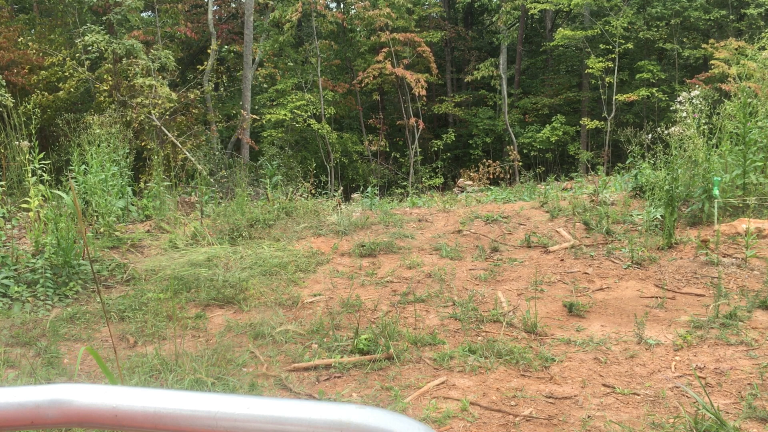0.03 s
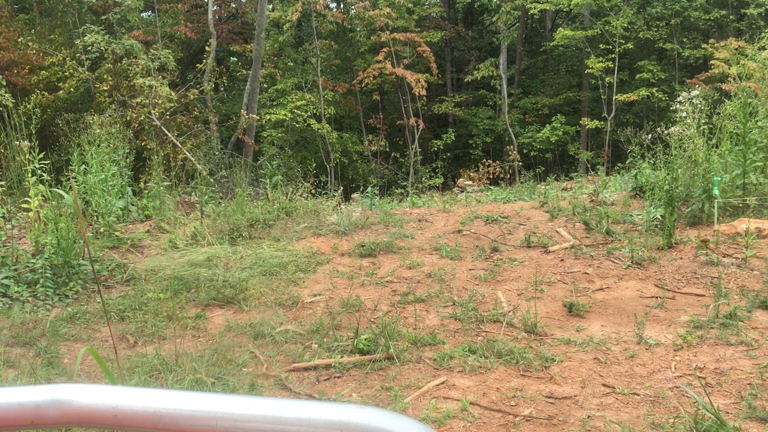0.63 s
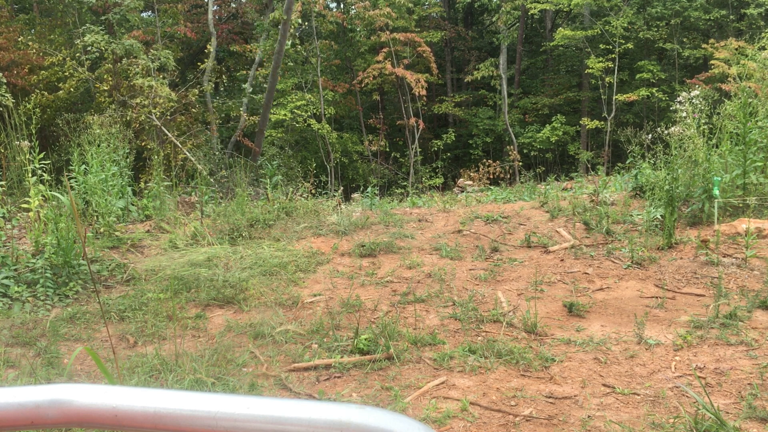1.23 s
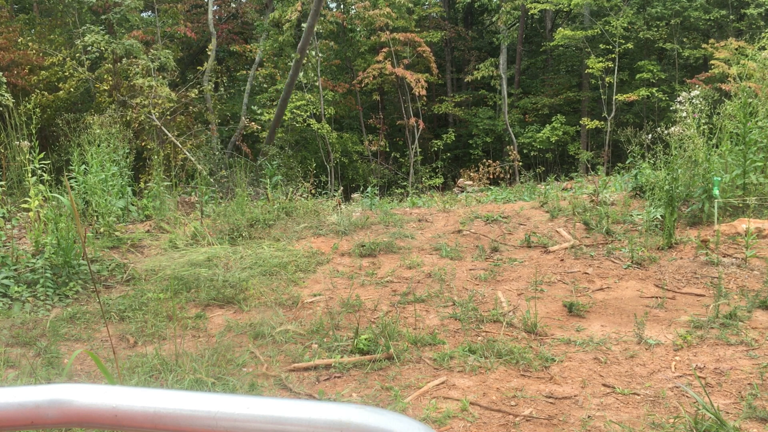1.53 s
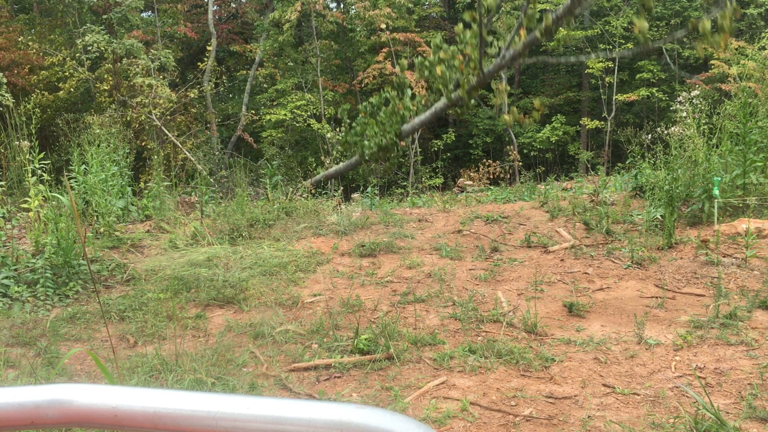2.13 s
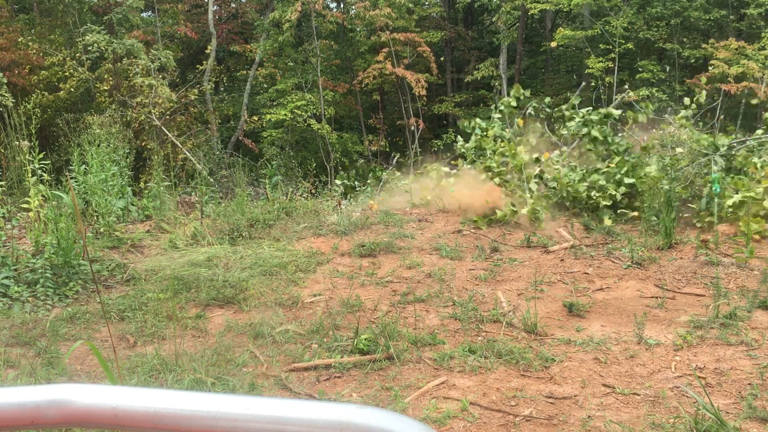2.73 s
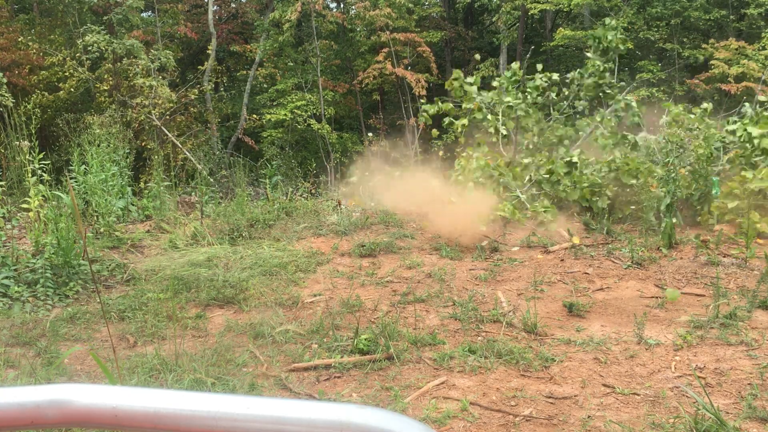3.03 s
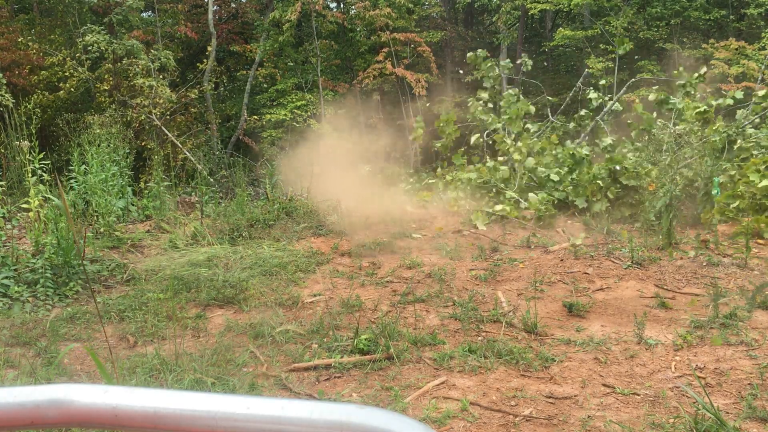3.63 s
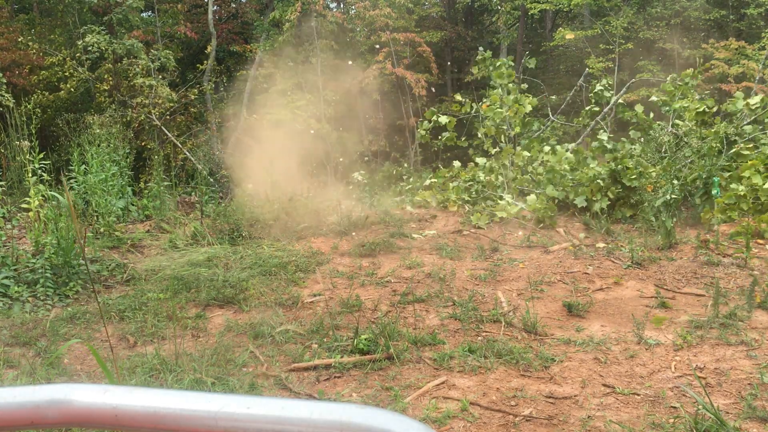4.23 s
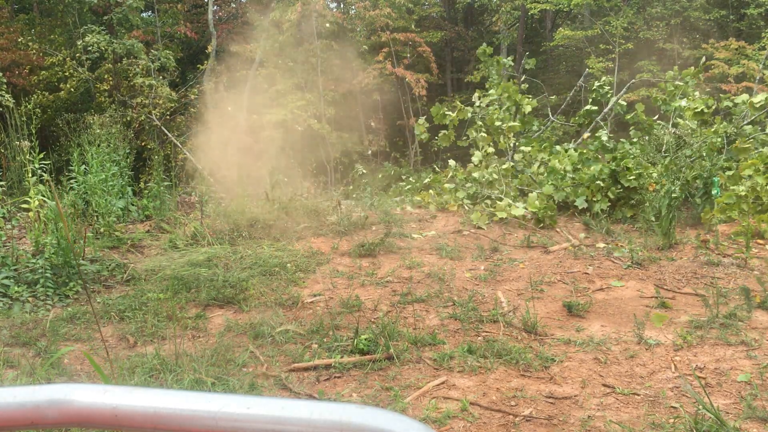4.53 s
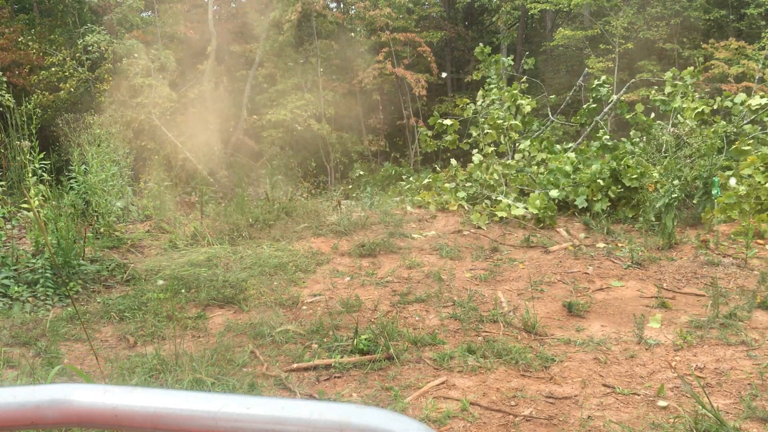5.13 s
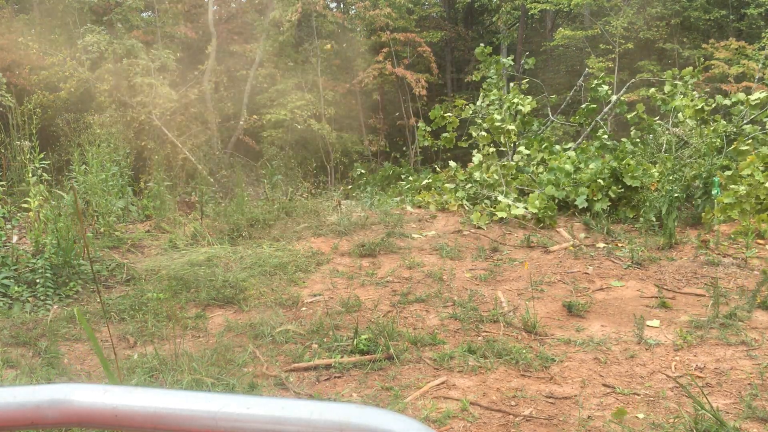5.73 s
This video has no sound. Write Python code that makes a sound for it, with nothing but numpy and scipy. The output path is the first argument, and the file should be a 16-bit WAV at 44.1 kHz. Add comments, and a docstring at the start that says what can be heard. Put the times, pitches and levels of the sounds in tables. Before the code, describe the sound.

Outdoors at a forest edge, a faint low machine drone and soft hiss lie under a growing rush of leaves. A falling tree knocks against its neighbours, then crashes onto dry earth with loud cracking limbs, a burst of foliage and a deep thud. The trunk bounces once, the leaves rustle away and a few twigs click as they drop.

```python
"""At the edge of a forest clearing, a tall leafy tree is felled. Its crown rushes through the air
ever faster and brushes its neighbours. Limbs snap, the trunk thuds onto dry earth and bounces once,
and the leaves shiver to rest. Twigs keep dropping over a low machine drone, faint high ticks and the
steady hiss of the forest. Leaves are noise plus many tiny clicks, breaking wood is short bursts of
noise, and the trunk is a few slow cycles of a low tone over a rumble."""
import sys
import numpy as np
from scipy import signal
from scipy.fft import rfft, irfft
from scipy.io import wavfile
from scipy.ndimage import uniform_filter1d

SR = 44100
rng = np.random.default_rng(int(sys.argv[2]) if len(sys.argv) > 2 else 0)


def to_wav(sig):
    """Store sig (one row per channel, or 1-D mono) as 16-bit WAV at the path in sys.argv[1].

    Samples outside -1..1 are clipped; the rate is SR.
    """
    pcm = np.clip(np.atleast_2d(sig), -1, 1) * 32767
    pcm = np.round(pcm).astype(np.int16)
    wavfile.write(sys.argv[1], SR, pcm.T)  # frames by channels


N = 263718
T = np.arange(N) / SR
FREQS = np.maximum(np.arange(N // 2 + 1) * SR / N, 1)

# The tone colour of each noise. Each row: frequency in Hz, relative level in dB.
FOREST_SPECTRUM = [(30, -3), (150, 11), (350, 4), (800, 1.5), (1600, -7), (3200, -4), (4500, -10.5),
                   (5600, -9.5), (7200, -16.5), (10500, -25), (13000, -16.5), (15500, -24.5)]
DRONE_SPECTRUM = [(22, -22), (37, -6.5), (55, 0), (80, -3.5), (100, -7.5), (130, -20), (220, -24),
                  (500, -40.5), (1500, -81.5)]
FLUTTER_SPECTRUM = [(200, -9), (700, -10), (1600, -0.5), (3000, 2), (4200, -4.5), (6000, -11.5),
                    (8000, -18), (10500, -24.5), (13000, -30), (15500, -46.5)]
SLAP_SPECTRUM = [(400, -13), (900, -3), (2000, 3), (3300, 5), (4500, -3.5), (6200, -8.5), (8000, -20.5),
                 (11000, -19), (12500, -31), (15500, -42.5)]
TEAR_SPECTRUM = [(2000, -18), (4500, -3), (6300, 4), (8500, -10), (11000, -7.5), (13000, -16.5),
                 (15500, -26)]
BOUGH_SPECTRUM = [(60, -32), (130, -4.5), (200, -1.5), (300, 0.5), (550, -7), (1000, -8.5), (1800, -29),
                  (4000, -54)]
GROUND_SPECTRUM = [(24, -35), (40, -8.5), (55, 3.5), (85, 1.5), (130, -14), (250, -32.5), (600, -50)]
# The machine's steady tones. Each row: pitch in Hz, level in dB.
HUM_TONES = [(479, -81.5), (630, -86.5), (868, -96), (1513, -84.5), (2250, -82), (3138, -84.5), (3752, -81)]
# Spells of faint whining. Each row: start in seconds, length in seconds, level in dB.
WHINE_SPELLS = [(3.583, 0.34, -76), (4.63, 0.32, -73), (5.53, 0.56, -80)]
# The machine's airy whirr. Each row: centre in Hz, width in Hz, level at idle in dB.
WHIRR_BANDS = [(1460, 130, -74), (2397, 130, -73.5)]
# Ticks outside the steady beat. Each row: start in seconds, level in dB.
OFFBEAT_TICKS = [(0.3433, -61), (.5601, -67), (4.2218, -63), (4.561, -64), (5.7862, -63)]
# Twigs snapping and dropping. Each row: start in seconds, level in dB, centre in Hz,
# width in octaves, decay in seconds.
TWIG_SNAPS = [(2.3394, -15.5, 3440, 0.25, 0.0018), (2.903, -39, 3200, 0.34, .003),
              (3.225, -34.5, 1670, .22, 0.0016), (3.972, -58, 3800, 0.73, .007),
              (4.068, -57, 3080, .7, .01), (4.462, -60.5, 4000, 0.53, .015), (4.579, -55, 3450, 0.62, .006),
              (4.586, -61, 4000, 0.68, .008), (4.618, -58, 3300, .7, 0.0025),
              (4.806, -59, 4000, 0.67, 0.0034), (4.952, -61, 3070, 0.77, 0.0043),
              (5.675, -50, 2900, .75, 0.0017)]
# Limbs knocking and breaking. Each row: start in seconds, level in dB, centre in Hz, rise in seconds.
LIMB_SNAPS = [(1.669, -43.5, 500, 0.00087), (1.761, -32, 440, 0.0028), (1.779, -32, 424, 0.0019),
              (1.851, -39, 420, .001), (1.988, -36.5, 350, 0.0017), (2.347, -18.5, 330, 0.00089),
              (2.367, -21.5, 900, 0.00243), (2.374, -10.5, 1150, .0046), (2.388, -19, 380, 0.0024),
              (2.3982, -7.5, 1800, 0.0021), (2.403, -18.5, 3300, .001), (2.442, -16, 1000, 0.0011),
              (2.449, -22.5, 605, 0.0029), (2.457, -25.5, 380, .003), (2.527, -20, 1700, .0013)]
# The trunk landing and bouncing. Each row: start in seconds, level in dB, pitch in Hz, rise in seconds.
TRUNK_THUDS = [(2.370, -13, 79.7, .021), (2.435, -23.5, 92.2, 0.02), (2.746, -24.5, 90, 0.02)]
# Peaks and dips of the microphone housing. Each row: centre in Hz, width in Hz, gain in dB.
HOUSING_BANDS = [(152.5, 12, 2), (216, 36, -1), (319, 22, 1.5), (385, 32, 3), (510, 41, 1), (632, 25, 4),
                 (720, 47, -0.5), (870, 36, 2), (1152, 110, 1.5), (1363, 53, -5.5), (1590, 58, 1),
                 (1688, 53, 4), (1862, 99, -2), (2326, 130, 1.5), (2640, 230, -1.5), (3150, 65, 2),
                 (3280, 105, 2), (3650, 50, 2), (4910, 170, -4.5), (5385, 306, 5), (7670, 1040, -4.5),
                 (9980, 1100, 4), (12500, 980, -4)]

BRUSH_S, LANDS_S = 1.8, 2.412  # the crown brushes its neighbours, then meets the earth


def undb(db):
    """Turn decibels into a gain."""
    return 10 ** (np.asarray(db) / 20)


def unit(x):
    """Scale a sound to an average (rms) level of 1."""
    return x / np.sqrt(np.mean(x ** 2))


def colour(x, points):
    """Filter a sound along a curve of (Hz, dB) points, then scale it to level 1."""
    hz, db = np.transpose(points)
    curve_db = np.interp(np.log(FREQS), np.log(hz), db)
    return unit(irfft(rfft(x) * undb(curve_db), N))


def bell(offset, width):
    """A bell-shaped curve that is 1 where the offset is 0."""
    return np.exp(-.5 * (offset / width) ** 2)


def noise():
    """White noise."""
    return rng.standard_normal(N)


def walk(per_s):
    """Wander by about 1 either way, turning per_s times a second."""
    return np.sqrt(1.5) * np.interp(T * per_s, np.arange(N), noise())


def tone(hz, waver):
    """A slightly unsteady sine wave at level 1."""
    pitch = hz * (1 + waver * walk(14))
    return unit(np.sin(2 * np.pi * np.cumsum(pitch) / SR))


def swell(s, rise_db_per_s, hold_s, die_db_per_s):
    """A gain that grows to 1 at time s, holds and dies away."""
    before, after = np.maximum(s - T, 0), np.maximum(T - s - hold_s, 0)
    return undb(-rise_db_per_s * before - die_db_per_s * after)


def grains(per_s, spread_db):
    """Tiny clicks of contact at random moments, many weak and a few strong."""
    hit = rng.random(N) < per_s / SR
    size = undb(spread_db * np.minimum(rng.exponential(size=N), 3.5))
    return unit(hit * size * np.sign(noise()) / np.sqrt(per_s))


def burst(hz, octaves, rise_s, decay_s):
    """A short burst of noise around one pitch, like wood fibres tearing."""
    t = T[:8192]
    freqs = np.maximum(np.arange(len(t) // 2 + 1) * SR / len(t), 1)
    band = irfft(rfft(rng.standard_normal(len(t))) * bell(np.log2(freqs / hz), octaves))
    steady = band / np.sqrt(2 * uniform_filter1d(band ** 2, size=200) + 1e-18)  # even out the level
    return steady * np.minimum(t / rise_s, 1) * np.exp(-np.maximum(t - rise_s, 0) / decay_s)


def add(track, s, sound):
    """Mix a sound in at time s."""
    i = max(int(s * SR), 0)
    track[i:i + len(sound)] += sound[:max(N - i, 0)]


def forest():
    """The forest hisses steadily in the distance."""
    return colour(noise(), FOREST_SPECTRUM) * undb(-66 + .5 * walk(1.6))


def whirr():
    """Air from the machine hisses in two soft resonances."""
    return sum(undb(db) * unit(irfft(rfft(noise()) * bell(FREQS - hz, width), N))
               for hz, width, db in WHIRR_BANDS)


def machine():
    """A machine hums and at times whines; under load its throbbing drone grows and its whirr drops."""
    load = np.clip((T - 3.8) / .2 + .5, 0, 1)  # from idle (0) to working (1) around 3.8 seconds
    drone = colour(noise(), DRONE_SPECTRUM) * undb(-62 + 5.5 * load + 2.14 * walk(5.7))
    spells = sum(undb(db) * swell(s, rise_db_per_s=61, hold_s=length, die_db_per_s=130)
                 for s, length, db in WHINE_SPELLS)
    whine = tone(hz=1190, waver=.0021) * spells
    hum = sum(tone(hz, waver=.0039) * undb(db + .94 * walk(4)) for hz, db in HUM_TONES)
    return drone + whine + hum + whirr() * undb(-5 * load)


def ticks():
    """Faint ticks, each with a very high tip and a lower body; most keep a steady beat."""
    out = np.zeros(N)
    beat = [(s, -63.5 + 1.5 * rng.standard_normal()) for s in np.arange(.422, T[-1], .2995)]
    for s, db in beat + OFFBEAT_TICKS:
        add(out, s, undb(db) * burst(hz=12000, octaves=.13, rise_s=.00045, decay_s=.0015))
        add(out, s, undb(db + 3) * burst(hz=4000, octaves=.6, rise_s=.0007, decay_s=.0036))
    return out


def bump():
    """One soft, low bump after everything has settled."""
    out = np.zeros(N)
    add(out, 5.915, undb(-44.5) * burst(hz=150, octaves=.38, rise_s=.019, decay_s=.017))
    return out


def tree_echo(x, fade_s, echo_db):
    """Trunks around the clearing add a thin, dull echo that falls 60 dB in fade_s."""
    t = T[:SR]
    scatter = noise()[:SR] * np.exp(-np.log(1000) * t / fade_s) * (1 - np.exp(-t / .0064))
    dull = signal.sosfilt(signal.butter(1, 3000, fs=SR, output="sos"), scatter)
    return x + undb(echo_db) * signal.fftconvolve(x, dull / np.linalg.norm(dull))[:N]


def shaking(fall_db, brush_db, crash_db, settle_db):
    """How hard the crown shakes, as a gain: it speeds up, brushes past trees, crashes and settles."""
    fall = undb(fall_db) * swell(LANDS_S, rise_db_per_s=17.5, hold_s=0, die_db_per_s=69.5)
    brush = undb(brush_db) * swell(BRUSH_S, rise_db_per_s=170, hold_s=0, die_db_per_s=12.5)
    crash = undb(crash_db) * swell(LANDS_S, rise_db_per_s=139, hold_s=.089, die_db_per_s=69.5)
    settle = undb(settle_db) * swell(LANDS_S, rise_db_per_s=139, hold_s=0, die_db_per_s=18)
    return np.sqrt(fall ** 2 + brush ** 2 + crash ** 2 + settle ** 2)


def leaves():
    """Leaves flutter softly in the air, then slap and crackle crisply once the crown is down."""
    shake = shaking(fall_db=-38.5, brush_db=-49, crash_db=-24.5, settle_db=-36.5)
    breeze = undb(-67)
    level_db = 20 * np.log10(np.hypot(shake, breeze))
    contacts_per_s = 5000 * undb(.4 * (level_db + 36.5))
    # the share of the moving leaves that touch the ground
    down = swell(LANDS_S, rise_db_per_s=83, hold_s=.51, die_db_per_s=9.5)
    flutter = colour(noise() + .54 * grains(contacts_per_s, spread_db=3), FLUTTER_SPECTRUM)
    slaps = colour(.76 * noise() + grains(contacts_per_s, spread_db=3.5), SLAP_SPECTRUM)
    clumps_db = .87 * walk(25) + .7 * walk(130)  # whole sprays of leaves hit together
    rustle = (np.sqrt(1 - down) * flutter + np.sqrt(down) * slaps) * undb(level_db + clumps_db)
    # only the hardest slaps tear leaves, so this sizzle grows faster than the rustle
    tearing = colour(grains(contacts_per_s, spread_db=3.5), TEAR_SPECTRUM)
    return rustle + tearing * undb(-39 + 1.28 * (level_db + 27))


def boughs():
    """Air rushes past the big limbs while the wood gives many small knocks."""
    rush = colour(noise() + .63 * grains(per_s=300, spread_db=4), BOUGH_SPECTRUM)
    shake = shaking(fall_db=-41, brush_db=-50.5, crash_db=-33.5, settle_db=-46)
    return rush * shake * undb(walk(30))


def snaps():
    """Each limb breaks with a crack, a low shudder and a spray of splinters; twigs just click."""
    out = np.zeros(N)
    for s, db, hz, rise_s in LIMB_SNAPS:
        crack = burst(hz, octaves=.79, rise_s=rise_s, decay_s=.0048)
        shudder = undb(-10) * burst(hz=289, octaves=.61, rise_s=.0074, decay_s=.01)
        splinters = undb(-16) * burst(hz * 5.5, octaves=.35, rise_s=.0005, decay_s=.0013)
        add(out, s, undb(db) * (crack + shudder + splinters))
    for s, db, hz, octaves, decay_s in TWIG_SNAPS:
        add(out, s, undb(db) * burst(hz, octaves, rise_s=.00099, decay_s=decay_s))
    return out


def trunk():
    """Each landing swells and dies in a few slow cycles; the earth rumbles around it."""
    thuds = np.zeros(N)
    shoved_air = undb(-42.5) * swell(LANDS_S, rise_db_per_s=30, hold_s=0, die_db_per_s=30)
    rumble_power = shoved_air ** 2
    t = T[:SR // 2]
    for s, db, hz, rise_s in TRUNK_THUDS:
        push = (t / rise_s * np.exp(1 - t / rise_s)) ** 6.8  # crushed branches cushion the blow
        phase = 2 * np.pi * hz * t
        flex = undb(-15.5) * np.sin(1.8 * phase)  # the trunk also bends at a higher pitch
        add(thuds, s, -undb(db) * push * (np.sin(phase) + flex))
        earth = undb(db - 15.5) * swell(s, rise_db_per_s=350, hold_s=0, die_db_per_s=56.5)
        rumble_power += earth ** 2
    return thuds + colour(noise(), GROUND_SPECTRUM) * np.sqrt(rumble_power)


def scene():
    """The falling tree and the sounds of its clearing, in one channel."""
    breaks = tree_echo(snaps(), fade_s=.52, echo_db=-19)
    tree = leaves() + boughs() + breaks + trunk()
    return (tree + ticks() + bump() + machine() + forest())[None]


def record(dry):
    """The microphone housing rings at a few pitches; treble above 15500 Hz is cut steeply."""
    housing_db = sum(db * bell(FREQS - hz, width) for hz, width, db in HOUSING_BANDS)
    # reshape the filter so that its ringing comes after each blow, never before
    cepstrum = irfft(np.log(undb(housing_db)), N)
    cepstrum[1:N // 2] *= 2
    cepstrum[N // 2 + 1:] = 0
    heard = irfft(rfft(dry) * np.exp(rfft(cepstrum)), N)
    return signal.sosfilt(signal.ellip(10, .2, 80, 15500, fs=SR, output="sos"), heard)


dry = scene()
out = record(dry)
to_wav(out)
```